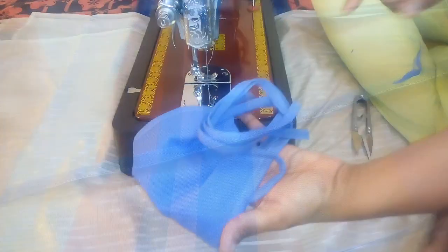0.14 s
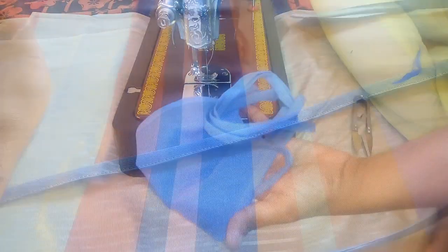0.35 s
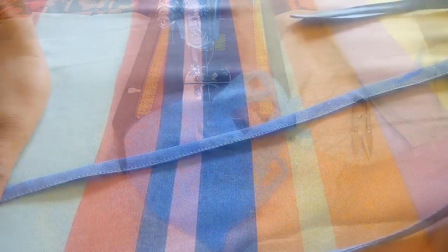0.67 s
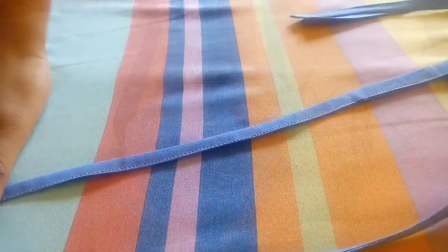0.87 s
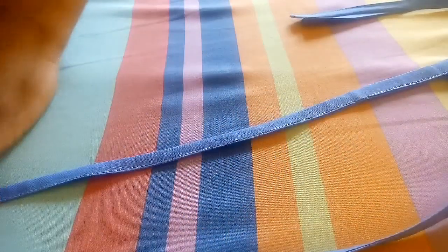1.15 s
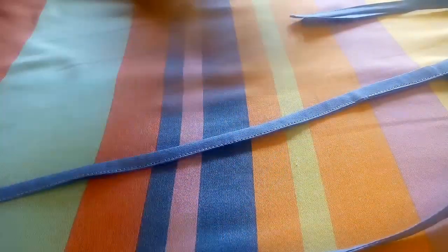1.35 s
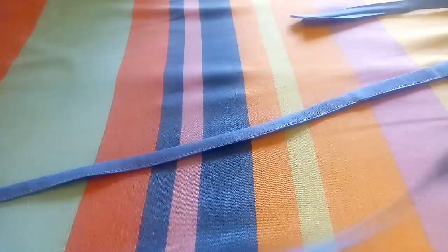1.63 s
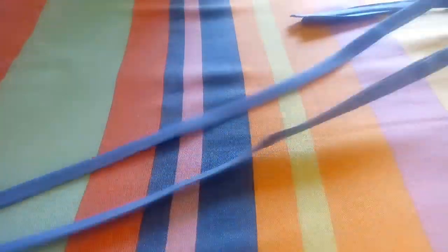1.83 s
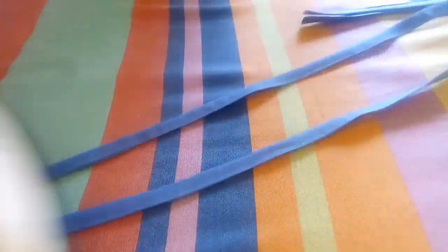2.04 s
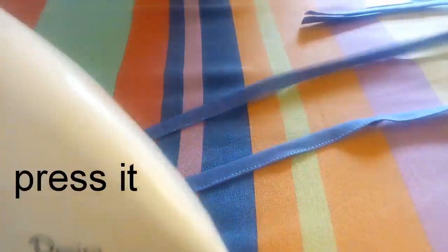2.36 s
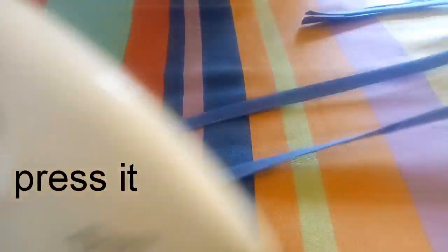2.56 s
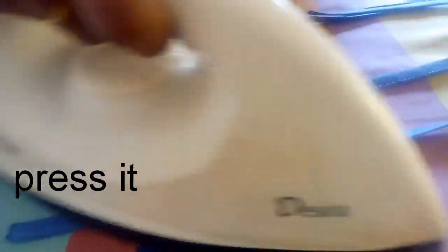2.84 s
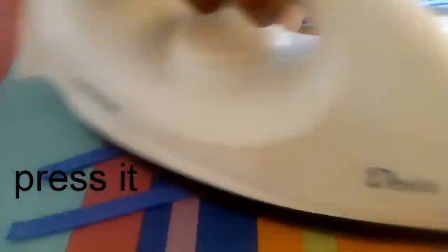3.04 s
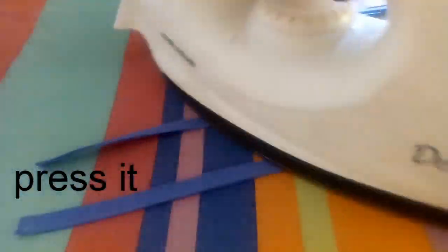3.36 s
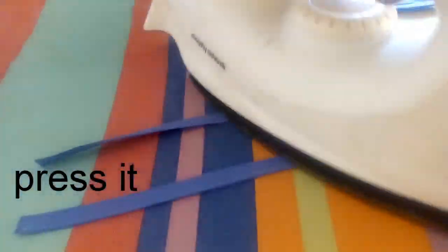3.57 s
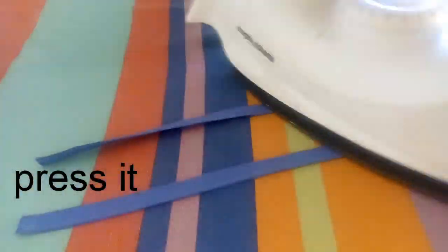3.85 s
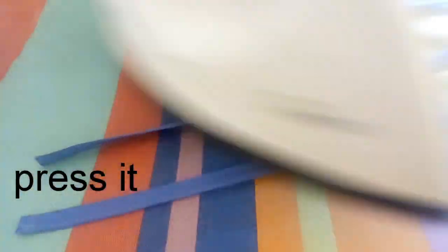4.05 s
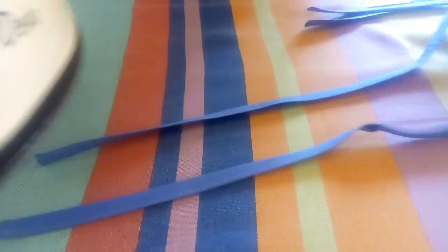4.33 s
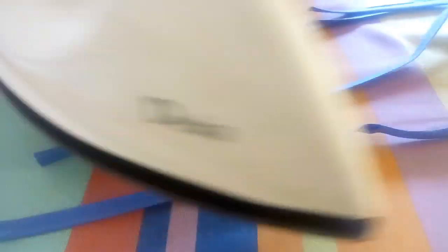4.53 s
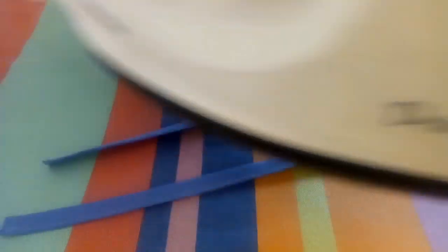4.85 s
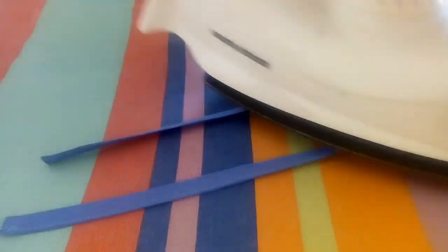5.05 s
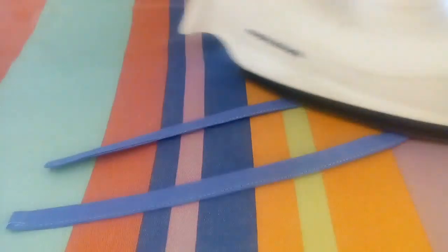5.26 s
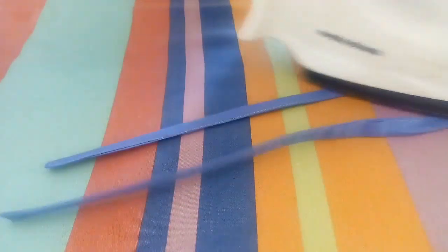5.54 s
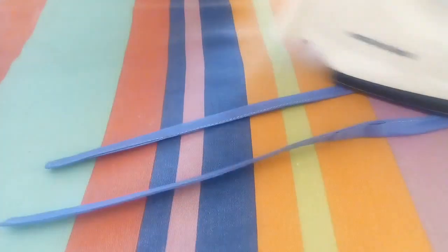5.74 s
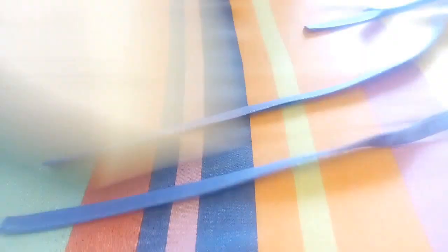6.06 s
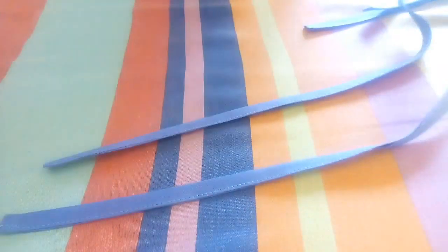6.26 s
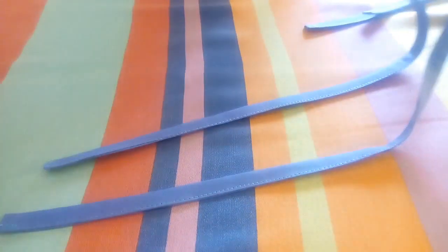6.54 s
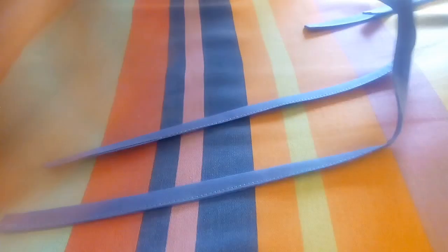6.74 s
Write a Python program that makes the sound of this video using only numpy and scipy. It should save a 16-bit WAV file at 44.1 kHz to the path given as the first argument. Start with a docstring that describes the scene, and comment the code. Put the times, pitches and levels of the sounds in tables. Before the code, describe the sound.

After a near-silent second, wood clunks across a room and a hard clack rings; then an iron creaks, ticks and thumps softly on a padded board.

```python
"""A quiet hush fades, with faint bumps of the hand on the microphone; then the steady tone of a bare room.
At a distance wood scrapes, clunks and rings, and a hard clack follows: noise bursts, modes, wall echoes.
Close to the microphone an iron glides over cloth on a padded board (shaped noise and crackle), its plastic
shell creaks (short sines and ticks), its metal sole rings, and it thumps on the board, whose frame
shudders (low sines and noise)."""
import sys
import numpy as np
from scipy import signal
from scipy.fft import rfft, irfft, next_fast_len
from scipy.io import wavfile

SR = 44100
rng = np.random.default_rng(int(sys.argv[2]) if len(sys.argv) > 2 else 0)


def to_wav(sig):
    """Store sig (one row per channel, or 1-D mono) as 16-bit WAV at the path in sys.argv[1].

    Samples outside -1..1 are clipped; the rate is SR.
    """
    pcm = np.clip(np.atleast_2d(sig), -1, 1) * 32767
    pcm = np.round(pcm).astype(np.int16)
    wavfile.write(sys.argv[1], SR, pcm.T)  # frames by channels


N = 304085
TIME = np.arange(N) / SR   # [s]

# All levels in the tables are relative; each source adds its own gain.

# Room tone, colour: (frequency [Hz], level [dB])
AIR_COLOUR = [(15, -37), (25, -22.5), (86, -2), (122, -11.5), (144, -1.5), (178, -8.5), (289, -3.5),
              (368, -12.5), (433, -12.5), (848, -21.5), (1270, -19.5), (1570, -26), (2300, -28.5),
              (3000, -32), (15500, -49.5)]
OPENING_DB, FADE_END_S, FADE_POWER = -67, 0.88, 0.59   # the first, quieter hush
AIR_DB, AIR_START_S = -61.5, 1.005   # the steady tone

# Fingers bump the microphone: (time [s], level [dB], pitch [Hz], left minus right [dB])
FINGER_BUMPS = [(.308, -57.5, 97, 15), (0.597, -59.5, 76, 31), (1.444, -44, 102, 36),
                (2.387, -45, 75.6, 18), (3.741, -47.5, 86.3, -1), (3.796, -41.5, 67.6, -25),
                (3.895, -39.5, 71, -37), (3.979, -44.5, 80, -30), (4.197, -38, 108.6, -27),
                (5.744, -40, 85.3, -23), (5.763, -40, 96, -30)]
# The hand shifts its grip: (start time [s], length [s], level [dB], left minus right [dB])
GRIP_SHIFTS = [(0.27, 0.48, -72.5, 18), (1.972, 0.36, -55.5, -20), (2.253, 0.29, -55, 13),
               (3.157, 0.52, -59.5, -4), (3.627, 0.66, -50, -23), (4.326, .2, -57, -20),
               (5.406, 0.8, -81, -17), (6.4, 0.99, -65, 16)]
# Rumble of the shifting grip, colour: (frequency [Hz], level [dB])
GRIP_COLOUR = [(20, -22.5), (45, 6.5), (70, 8), (120, 1), (200, -13.5), (400, -32.5), (1000, -51),
               (16000, -94)]
BUMP_SWELL_S, GRIP_ROUNDNESS = 0.0082, 0.54   # roundness: power of each shift's half sine

# Dull clicks at a distance: (time [s], level [dB])
CLICKS = [(.82, -46.5), (1.9475, -1), (2.054, -19)]
# Their colour: (frequency [Hz], level [dB])
CLICK_COLOUR = [(100, -27), (400, -14.5), (560, 1.5), (750, -13), (1200, -2.5), (2300, 0.5), (4000, -9.5),
                (7000, -21.5), (16000, -36.5)]

# Scrape of the wood before it lands, colour: (frequency [Hz], level [dB])
DRAG_COLOUR = [(60, -66), (150, -21), (240, -2), (340, -16), (520, 4), (760, -14), (1200, -15), (2300, -16),
               (3200, -26.5), (4200, -27), (5000, -28.5), (7000, -33.5), (8000, -41), (16000, -54.5)]
DRAG_START_S, DRAG_END_S, DRAG_EDGE_S, DRAG_DB = 1.003, 1.08, 0.0093, -42.5

# Wooden clunk across the room, blow by blow: (time [s], level [dB])
CLUNKS = [(1.073, 4.5), (1.088, 0), (1.113, -4.5), (1.128, -7.5)]
# Its colour: (frequency [Hz], level [dB])
CLUNK_COLOUR = [(60, -36), (150, -34), (240, -16), (350, -15), (500, 2), (600, 7), (720, -6), (880, -6),
                (1300, -16.5), (2500, -25), (5500, -36), (8000, -44.5), (10000, -46.5), (16000, -52.5)]
# What it rings with: (frequency [Hz], level [dB], time to fall 60 dB [s])
CLUNK_MODES = [(555, -1, 0.17), (631, -4, 0.15), (688, -12.5, 0.45), (795, -8.5, 0.23), (897, -22, 0.81),
               (929, -15, .39), (1221, -17, 0.27), (1680, -22.5, 0.46)]

# The iron thumps on the padded board: (time [s], level [dB], level of the frame's shudder [dB])
THUMPS = [(1.525, -34, -47.5), (1.561, -35, -60), (3.228, -54.5, -46), (3.379, -50, -52.5),
          (4.751, -42.5, -72), (5.103, -26, -46.5), (6.398, -37.5, -46), (6.659, -25.5, -39.5),
          (6.742, -42.5, -74)]
# Modes of a soft blow: (multiple of its pitch, level [dB])
SOFT_BLOW_MODES = [(.92, 1.5), (.4, -8.5), (.7, -11.5), (1.45, -11.5), (2.099, -15), (3.2, -26)]
# Shudder of the loose frame, colour: (frequency [Hz], level [dB])
SHUDDER_COLOUR = [(20, -3), (60, -3.5), (110, -0.5), (155, 8.5), (230, -4.5), (380, -4.5), (600, -11),
                  (1000, -18.5), (1500, -26.5), (2500, -33), (6000, -46), (16000, -65)]
THUMP_HZ, THUMP_SWELL_S = 70.18, 0.016
BLOW_SAG, SAG_S = 0.3, 0.018   # share by which a soft blow starts sharp, and how soon it settles

# Hard clack, as of a switch: (time [s], level [dB])
CLACKS = [(1.6735, 2.5)]
# Its colour: (frequency [Hz], level [dB])
CLACK_COLOUR = [(60, -10), (160, -12), (280, -3.5), (480, -7.5), (1100, -20.5), (1600, -8.5), (2050, -6),
                (2450, 1.5), (3100, -10), (3950, -0.5), (4700, -4.5), (5600, -2.5), (7500, -9),
                (10000, -21), (16000, -26)]
# What it rings with: (frequency [Hz], level [dB], time to fall 60 dB [s])
CLACK_MODES = [(240, -1, .6), (2236, -2, .5), (2446, -2, .5), (2558, -3, .4), (3672, 0, .42),
               (3944, -2, .35), (3988, 1, .4), (4232, -3, .45), (4402, -2, .42), (4968, -1, .3),
               (5118, -3, .45), (5497, -2, .35), (5657, -2, .4), (6442, -3, .4), (7150, -4, .4)]

# Strokes over the cloth: (start time [s], length [s], level of the hiss [dB], level of the sole's ring [dB])
STROKES = [(1.954, 0.2, -60.5, -85), (2.302, 1.23, -79.5, -105), (3.588, 0.72, -81.5, -105),
           (4.33, 0.16, -88, -72.5), (4.629, 0.41, -84, -95), (5.026, 0.5, -78, -82),
           (5.498, 0.18, -79, -96.5), (5.67, .42, -74, -76), (6.483, 0.17, -80, -72)]
# Hiss and crackle of the cloth, colour: (frequency [Hz], level [dB])
GLIDE_COLOUR = [(200, -31), (700, -18), (1500, 1), (2500, 9), (3200, -14), (4200, 9), (4900, -1.5),
                (5800, 3.5), (7200, -1.5), (9000, -42), (16000, -17)]
# Ring of the metal sole, colour: (frequency [Hz], level [dB])
SOLE_COLOUR = [(1500, -42), (2300, -7), (2520, 3), (2720, 5), (3100, -19), (3750, -6.5), (4100, -3.5),
               (4650, -18.5), (5500, -8), (6500, -23), (9000, -30)]
# Knocks on the sole: (time [s], level [dB])
SOLE_KNOCKS = [(6.385, -54)]
RUB_POWER = 0.75   # the sound of rubbing grows with this power of the speed
SOLE_T60_S, SOLE_RISE_S = 0.31, 0.0013

# Creaks of the iron's shell:
# (time [s], level of the ring [dB], level of the tick [dB], pitch of the tick [Hz], rattle's 60 dB fall [s])
CREAKS = [(2.209, -41.5, -66.5, 1800, 0.053), (2.324, -58.5, -65, 2800, 0.04),
          (2.339, -45, -59.5, 3020, 0.046), (2.477, -52.5, -80, 1200, 0.12), (2.532, -48, -82, 1190, .1),
          (2.804, -47, -62, 2200, 0.096), (2.91, -40, -70.5, 2215, 0.046), (3.23, -34, -56, 2240, 0.039),
          (3.251, -34, -54.5, 2200, 0.055), (3.272, -31.5, -53, 2200, 0.049),
          (3.298, -39.5, -64, 2190, .03), (3.324, -41.5, -77, 2200, .03), (3.366, -53, -52, 6760, 0.064),
          (3.376, -42, -53.5, 2900, 0.029), (3.413, -46, -72, 2170, 0.033),
          (3.54, -51.5, -58.5, 2150, 0.015), (3.578, -39, -58, 2190, 0.061),
          (3.684, -58, -54.5, 6000, 0.032), (3.706, -63, -56.5, 3810, .18), (3.735, -50, -58, 6200, 0.04),
          (3.95, -48.5, -60, 1440, 0.14), (5.723, -50, -62, 1220, 0.045), (5.766, -44.5, -64, 1240, 0.05),
          (5.992, -80, -60, 1203, 0.083), (6.246, -81, -63.5, 2500, 0.012),
          (6.3895, -30.5, -40.5, 1950, 0.024), (6.525, -52.5, -57, 7400, 0.097),
          (6.54, -34, -67, 6000, 0.022), (6.574, -37.5, -52.5, 4950, 0.26), (6.607, -34, -56, 4500, 0.012),
          (6.641, -35, -52.5, 1010, 0.15), (6.649, -24, -46, 920, 0.042), (6.692, -34, -60, 1110, .03)]
# Modes of the plastic shell: (multiple of its pitch, level [dB], time to fall 60 dB [s])
SHELL_MODES = [(1, 5.5, .021), (.76, -38, 0.13), (1.2, -29, 0.079), (1.7, -18, 0.014), (3.4, -45, 0.012)]
# Ticks of the shell, colour: (frequency [Hz], level [dB])
TICK_COLOUR = [(200, 9.5), (900, 10.5), (1400, 4), (2100, 3.5), (3000, -1.5), (4200, -1), (5200, -3),
               (7200, -10.5), (9000, -15.5), (16000, -24)]
# Place and hold of the iron: (time [s], left minus right [dB], pitch of the shell [Hz])
IRON_PATH = [(2.2, 14, 545), (2.55, 15.5, 548), (2.9, 20.5, 655), (3.25, 3.5, 620), (3.95, 0.5, 700),
             (5.75, -5, 642), (6.39, 8, 604), (6.6, 16, 536), (6.66, -0.5, 526)]
TICK_PEAK_DB, TICK_OCTAVES, SHORT_SLIP_S = 11, 0.33, 0.035
LEAD_S, LEAD_DROP_DB = 0.0068, 15.5   # the shell starts to give about this long before each creak
# afterwards it settles in weaker slips: rough spacing, first drop, further loss per slip
SETTLE_GAP_S, SETTLE_DROP_DB, SETTLE_FADE_DB = 0.016, 11.5, 6
SLIP_SPREAD_OCTAVES = 0.026   # no two slips ring at quite the same pitch

# How alike left and right are in diffuse noise: (frequency [Hz], likeness from 0 to 1)
LIKENESS = [(60, .55), (130, 0.94), (290, .85), (640, 0.41), (1400, 0.022), (16000, 0)]
# Stereo balance of diffuse noise: (frequency [Hz], left minus right [dB])
BALANCE = [(60, -3), (200, -5.5), (400, -3.5), (1300, -6), (2400, -4), (4400, -0.5), (16000, -1)]
# First echoes from the walls: (delay [s], level [dB])
WALL_ECHOES = [(0.0099, 13), (0.0141, -13), (0.0182, 10.5), (.0268, -3.5), (.030, 4)]
# Decay of the room: (frequency [Hz], time to fall 60 dB [s])
ROOM_T60 = [(100, 0.93), (260, 0.72), (700, 0.51), (1400, 0.51), (2400, 0.47), (5000, 0.49), (12000, 0.49)]
# Surfaces next to the microphone: (left delay [s], right delay [s], level [dB])
NEAR_ECHOES = [(.0029, 0.0019, -23.5), (.0043, .00427, -16.5)]
NEAR_LOW_HZ = 1400   # lower sound bends round these surfaces
LOW_CUT_HZ, CUTOFF_HZ = 30, 15900   # lower and upper limits of the microphone's sound


def from_db(db):
    """Decibels to gain."""
    return 10 ** (np.asarray(db) / 20)


def at_hz(points, hz):
    """Read a table on a log-frequency axis."""
    f, value = np.transpose(points)
    return np.interp(np.log(np.maximum(hz, 1)), np.log(f), value)


def panned(db):
    """Left and right gains of unit mean power; positive is louder on the left."""
    gains = from_db(np.array([[db], [-db]]) / 2)
    return gains / np.sqrt(np.mean(gains ** 2))


def add(out, s, sound):
    """Mix a short sound in at time s."""
    part = out[:, round(s * SR):][:, :sound.shape[-1]]
    part += sound[..., :part.shape[1]]


def noise(colour, size=N):
    """Diffuse stereo noise of rms 1: alike in the bass, unrelated in the treble."""
    fft_size = next_fast_len(size)
    hz = np.fft.rfftfreq(fft_size, 1 / SR)
    mid, side = rfft(rng.standard_normal((2, fft_size)))
    alike = np.clip(at_hz(LIKENESS, hz), -1, 1)
    sign = np.array([[1], [-1]])
    pair = np.sqrt(1 + alike) * mid + np.sqrt(1 - alike) * side * sign
    gains = from_db(at_hz(colour, hz) + sign * at_hz(BALANCE, hz) / 2)
    x = irfft(pair * gains, fft_size)[:, :size]
    return x / np.sqrt(np.mean(x ** 2))


def impact(colour, size=2048):
    """A causal (minimum-phase) click of the given colour and unit energy."""
    hz = np.fft.rfftfreq(size, 1 / SR)
    cepstrum = irfft(np.log(from_db(at_hz(colour, hz))))
    # folding the cepstrum forward in time gives minimum phase
    cepstrum[1:size // 2] *= 2
    cepstrum[size // 2 + 1:] = 0
    click = irfft(np.exp(rfft(cepstrum)))
    return click / np.sqrt(np.sum(click ** 2))


def contact(t60, spike_db, size=4096):
    """A rough contact: a snap and a burst of tiny impacts, different at each port; unit energy."""
    burst = rng.standard_normal((2, size)) * from_db(-60 * TIME[:size] / t60)
    burst /= np.sqrt(np.sum(burst ** 2, axis=1, keepdims=True))
    burst[[0, 1], rng.integers(0, 24, 2)] += from_db(spike_db)
    return burst / np.sqrt(np.sum(burst ** 2, axis=1, keepdims=True))


def soft_blow(hz, swell_s, size=16384):
    """A soft blow swells and sinks in a few low modes while its pitch sags."""
    t = TIME[:size]
    envelope = (t / swell_s) ** 1.43 * np.exp(1.3 * (1 - t / swell_s))
    cycles = hz * (t + BLOW_SAG * SAG_S * (1 - np.exp(-t / SAG_S)))
    modes = 0
    for multiple, db in SOFT_BLOW_MODES:
        modes = modes + from_db(db) * np.sin(2 * np.pi * (cycles * multiple + rng.random()))
    return envelope * modes


def swing(start, length, power):
    """A hand movement's speed follows a half sine; its sound follows a power of the speed."""
    speed = np.sin(np.pi * np.clip((TIME - start) / length, 0, 1))
    return np.maximum(speed, 1e-12) ** power


def waver(per_s, depth_db):
    """The hand never pushes evenly: a gain that wanders at random."""
    steps = rng.standard_normal(512)
    return from_db(depth_db * np.interp(TIME * per_s, np.arange(len(steps)), steps))


def room_response(echo_db, build_s, size=40960):
    """A few wall echoes and a diffuse tail that builds up and dies band by band; unit energy."""
    t, hz = TIME[:size], np.fft.rfftfreq(size, 1 / SR)
    white = rfft(noise([(20, 0), (20000, 0)], size=size))
    centres, t60s = np.transpose(ROOM_T60)
    out = 0
    # each row of the identity matrix picks one band, which overlaps its neighbours
    for share, t60 in zip(np.eye(len(centres)), t60s):
        band = irfft(white * at_hz(np.c_[centres, share], hz))
        out = out + band * from_db(-60 * t / t60)
    out = out * (1 - np.exp(-(t / build_s) ** 2))
    out /= np.sqrt(np.sum(out ** 2) / 2)
    for delay, db in WALL_ECHOES:
        # an echo reaches the two ports at slightly different moments
        arrival = ((delay + rng.uniform(-0.0003, 0.00012, 2)) * SR).astype(int)
        out[[0, 1], arrival] += from_db(db + echo_db)
    return out / np.sqrt(np.sum(out ** 2) / 2)


def in_room(x, room, wet_db):
    """What the walls send back."""
    return from_db(wet_db) * signal.fftconvolve(x, room, axes=1)[:, :N]


def far_blows(blows, colour, room, direct_db, wet_db, contact_t60):
    """Blows at a distance: the room is given more level than the direct sound."""
    direct, drive = np.zeros((2, N)), np.zeros((2, N))
    click = impact(colour)
    for s, db in blows:
        # keeping only the phase of a rough contact spreads the click in time but keeps its colour
        phase = np.angle(rfft(contact(contact_t60, spike_db=-12)))
        spread = irfft(np.exp(1j * phase))[:, :2048]
        blow = from_db(db) * signal.fftconvolve(spread, click[None], axes=1)
        add(direct, s, blow)
        add(drive, s, blow * panned(-0.44))
    return from_db(direct_db) * direct + in_room(drive, room, wet_db)


def ringing(blows, modes, level_db, size=32768):
    """From the first blow on, the struck thing rings in its modes, a quarter cycle apart at the ports."""
    out, t = np.zeros((2, N)), TIME[:size]
    s, blow_db = blows[0]
    onset = 1 - np.exp(-t / 0.0075)
    for hz, db, t60 in modes:
        port_shift = np.array([[0], [rng.choice([-1, 1]) * np.pi / 2]])
        phase = 2 * np.pi * rng.random() + port_shift
        decay = from_db(level_db + blow_db + db - 60 * t / t60)
        add(out, s, decay * onset * np.sin(2 * np.pi * hz * t + phase))
    return out * panned(-2.1)


def room_tone():
    """Coloured diffuse noise: a quiet hush sinks to a faint trace, then the steady tone sets in."""
    fade = np.clip(1 - TIME / FADE_END_S, 0.005, 1) ** FADE_POWER
    level = np.where(TIME < AIR_START_S, from_db(OPENING_DB) * fade, from_db(AIR_DB))
    return level * noise(AIR_COLOUR)


def handling(bump_db, rumble_db):
    """Fingers bump the microphone, mostly at one port; each port rumbles on its own as the grip shifts."""
    shifting = 0
    for s, length, db, pan in GRIP_SHIFTS:
        shifting = shifting + from_db(db + rumble_db) * swing(s, length, GRIP_ROUNDNESS) * panned(pan)
    out = shifting * np.array([noise(GRIP_COLOUR)[1], noise(GRIP_COLOUR)[1]])
    for s, db, hz, pan in FINGER_BUMPS:
        add(out, s, from_db(db + bump_db) * soft_blow(hz, BUMP_SWELL_S) * panned(pan))
    return out


def dull_clicks(room):
    """Dull clicks at a distance: a very faint one early on and two after the clack."""
    return far_blows(CLICKS, CLICK_COLOUR, room, direct_db=-9, wet_db=-7.5, contact_t60=0.0148)


def wood_drag():
    """The wood scrapes evenly for a moment as it comes to land: steady noise with short edges."""
    held = np.clip(np.minimum(TIME - DRAG_START_S, DRAG_END_S - TIME) / DRAG_EDGE_S, 0, 1)
    return from_db(DRAG_DB) * held * noise(DRAG_COLOUR)


def wooden_clunk(room):
    """Wood lands in a few ever weaker blows across the room and rings on in its modes."""
    blows = far_blows(CLUNKS, CLUNK_COLOUR, room, direct_db=-2, wet_db=-1.5, contact_t60=0.013)
    return blows + ringing(CLUNKS, CLUNK_MODES, level_db=-31.5)


def board_thumps(level_db, pan_db):
    """The padded board answers every blow at the same pitch and from the same place."""
    out = np.zeros((2, N))
    for s, db, _ in THUMPS:
        add(out, s, from_db(db + level_db) * soft_blow(THUMP_HZ, THUMP_SWELL_S) * panned(pan_db))
    return out


def frame_shudder(t60, swell_s):
    """Every thump sets the loose frame of the board shaking for a moment: decaying noise."""
    power = np.zeros(N)
    for s, _, db in THUMPS:
        since = np.maximum(TIME - s, 0)
        level = from_db(db - 60 * since / t60) * (1 - np.exp(-since / swell_s))
        power += level ** 2
    return np.sqrt(power) * noise(SHUDDER_COLOUR)


def hard_clack(room):
    """One short, hard contact at a distance excites the room and a set of bright modes."""
    blow = far_blows(CLACKS, CLACK_COLOUR, room, direct_db=-5.5, wet_db=6.0, contact_t60=0.005)
    return blow + ringing(CLACKS, CLACK_MODES, level_db=-44.5)


def cloth_glide(level_db, fibres_per_s, fibre_db):
    """Cloth hisses under the sole with every stroke; single fibres catch and crackle."""
    rubbing = sum(from_db(db + level_db) * swing(s, length, RUB_POWER) for s, length, db, _ in STROKES)
    catches = (rng.random((2, N)) < fibres_per_s / SR) * rng.standard_normal((2, N))
    crackle = signal.fftconvolve(catches, impact(GLIDE_COLOUR)[None], axes=1)[:, :N]
    return rubbing * (noise(GLIDE_COLOUR) + from_db(fibre_db) * crackle)


def sole_ring():
    """The metal sole rings softly as it rubs, and dies away after a knock: narrow bands of noise."""
    level = sum(from_db(db) * swing(s, length, RUB_POWER) for s, length, _, db in STROKES)
    for s, db in SOLE_KNOCKS:
        since = np.maximum(TIME - s, 0)
        level = level + from_db(db - 60 * since / SOLE_T60_S) * (1 - np.exp(-since / SOLE_RISE_S))
    return level * noise(SOLE_COLOUR)


def slips(count=2):
    """Each creak is a faint first slip, the main one, and a few ever weaker ones at uneven gaps."""
    for s, ring_db, tick_db, tick_hz, rattle_t60 in CREAKS:
        lead = LEAD_S * rng.uniform(0.5, 1.7)
        yield s - lead, ring_db - LEAD_DROP_DB, tick_db - LEAD_DROP_DB, tick_hz, rattle_t60
        yield s, ring_db, tick_db, tick_hz, rattle_t60
        waits = np.cumsum(SETTLE_GAP_S * rng.uniform(0.5, 1.4, count))
        for k, wait in enumerate(waits):
            loss = SETTLE_DROP_DB + k * SETTLE_FADE_DB
            yield s + wait, ring_db - loss, tick_db - loss, tick_hz, rattle_t60


def shell_ring(hz, late, rise_s):
    """The hollow plastic shell rings briefly in a few modes, a little differently each time."""
    body = 0
    for (multiple, db, t60), luck_db in zip(SHELL_MODES, rng.normal(0, 1, len(SHELL_MODES))):
        decay = from_db(db + luck_db - 60 * late / t60)
        body = body + decay * np.sin(2 * np.pi * hz * multiple * late)
    return body * (1 - np.exp(-late / rise_s))


def shell_tick(tick_hz, rattle_t60, spike_db, size):
    """A crisp tick and tiny rattle; the spot that slips lends them a resonance of its own."""
    grid = np.geomspace(100, SR / 2, num=80)
    peak = TICK_PEAK_DB * np.exp(-(np.log2(grid / tick_hz) / TICK_OCTAVES) ** 2)
    click = impact(np.c_[grid, at_hz(TICK_COLOUR, grid) + peak])
    # the longer the slip, the softer its start
    snap_db = spike_db - 20 * np.log10(rattle_t60 / SHORT_SLIP_S)
    return signal.fftconvolve(contact(rattle_t60, snap_db), click[None], axes=1)[:, :size]


def shell_creaks(body_gain_db, tick_gain_db, rise_s, spike_db, lag_s, size=4096):
    """Each slip gives a tick with a rattle and a short hollow ring, placed where the iron is."""
    out = np.zeros((2, N))
    late = np.maximum(TIME[:size] - np.array([[lag_s], [0]]), 0)   # the ring reaches the left port later
    when, pans, pitches = np.transpose(IRON_PATH)
    for s, ring_db, tick_db, tick_hz, rattle_t60 in slips():
        pan = np.interp(s, when, pans)
        hz = np.interp(s, when, pitches) * 2 ** rng.normal(0, SLIP_SPREAD_OCTAVES)
        ring = from_db(ring_db + body_gain_db) * shell_ring(hz, late, rise_s)
        tick = from_db(tick_db + tick_gain_db) * shell_tick(tick_hz, rattle_t60, spike_db, size)
        add(out, s, ring * panned(pan / 2 - 2) + tick * panned(pan))
    return out


def scene():
    """Room tone, the hand on the microphone, far blows and the iron close by."""
    room = room_response(echo_db=-21.5, build_s=0.015)
    near_hand = room_tone() + handling(bump_db=3.5, rumble_db=2)
    far = dull_clicks(room) + wood_drag() + wooden_clunk(room) + hard_clack(room)
    thumps = board_thumps(level_db=0, pan_db=-3.5) + frame_shudder(t60=0.4, swell_s=0.016)
    cloth = cloth_glide(level_db=1, fibres_per_s=40, fibre_db=7) + sole_ring()
    cloth *= waver(per_s=30, depth_db=1.2)
    creaks = shell_creaks(body_gain_db=10.5, tick_gain_db=27.0, rise_s=0.0077, spike_db=3, lag_s=0.0001)
    iron = thumps + in_room(thumps, room, wet_db=-19) + creaks + in_room(creaks, room, wet_db=-13.0)
    return near_hand + far + cloth + iron


def record(dry):
    """Small surfaces close by ripple the treble; the deepest bass fades and the top is cut steeply."""
    bright = signal.sosfilt(signal.butter(2, NEAR_LOW_HZ, "high", fs=SR, output="sos"), dry)
    heard = signal.sosfilt(signal.butter(2, LOW_CUT_HZ, "high", fs=SR, output="sos"), dry)
    for *delays, db in NEAR_ECHOES:
        echo = [np.pad(port, (round(delay * SR), 0))[:N] for port, delay in zip(bright, delays)]
        heard += from_db(db) * np.array(echo)
    return signal.sosfilt(signal.ellip(10, 0.2, 80, CUTOFF_HZ, fs=SR, output="sos"), heard)


dry = scene()
out = record(dry)
to_wav(out)
```